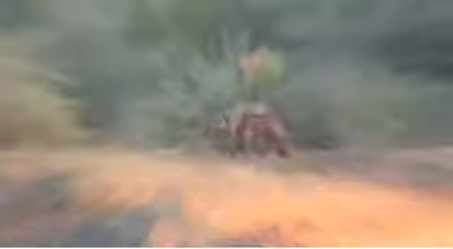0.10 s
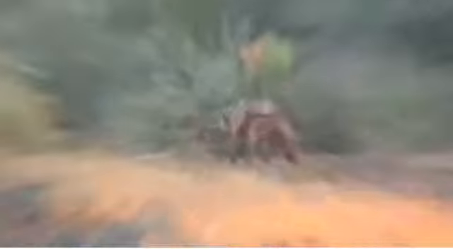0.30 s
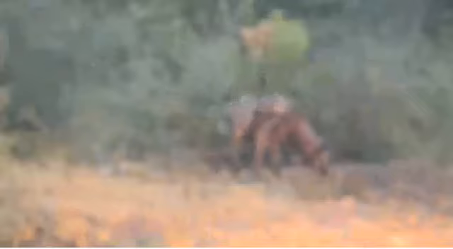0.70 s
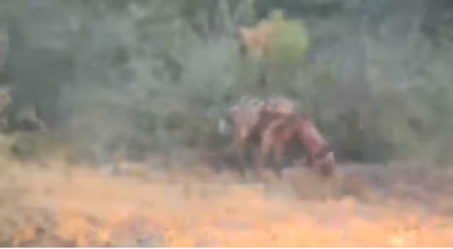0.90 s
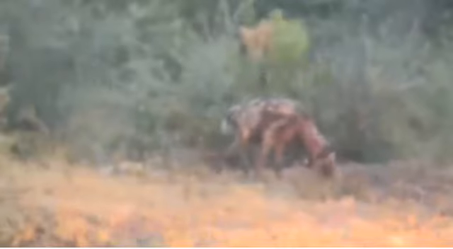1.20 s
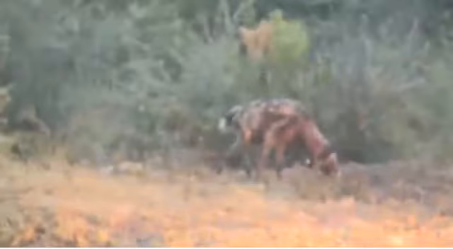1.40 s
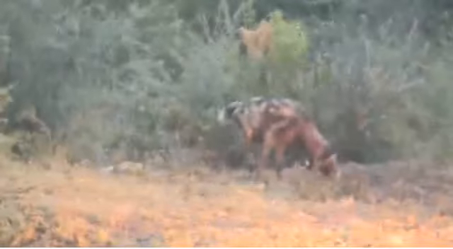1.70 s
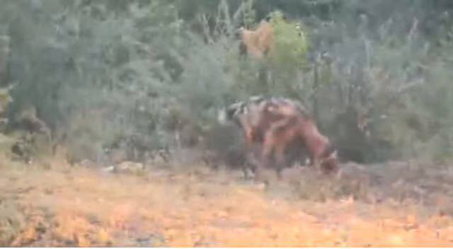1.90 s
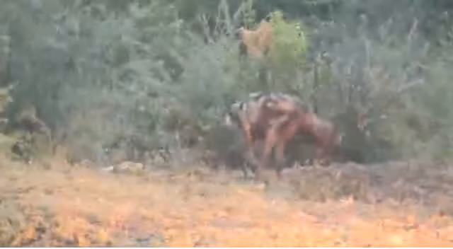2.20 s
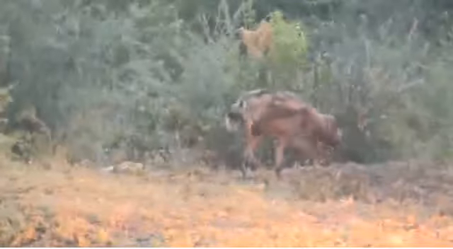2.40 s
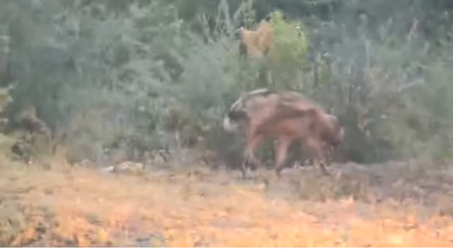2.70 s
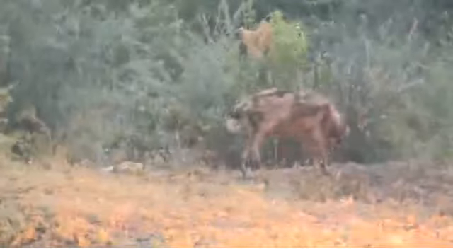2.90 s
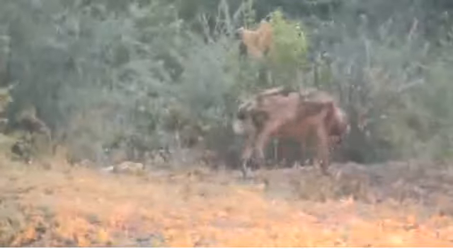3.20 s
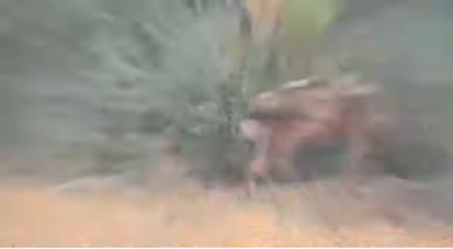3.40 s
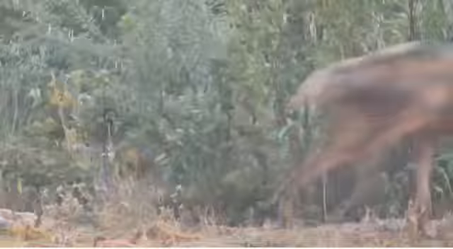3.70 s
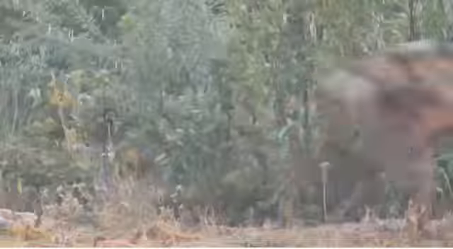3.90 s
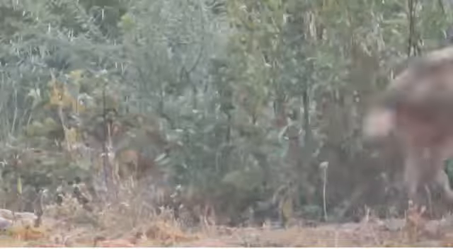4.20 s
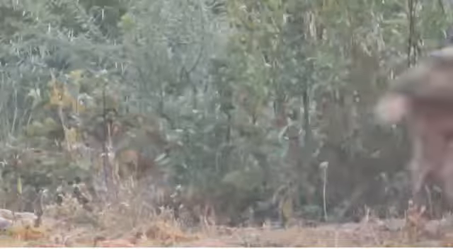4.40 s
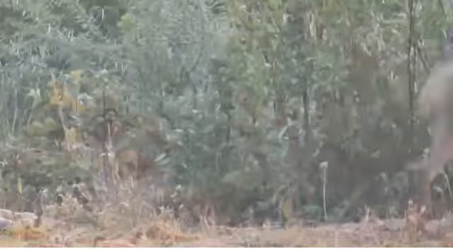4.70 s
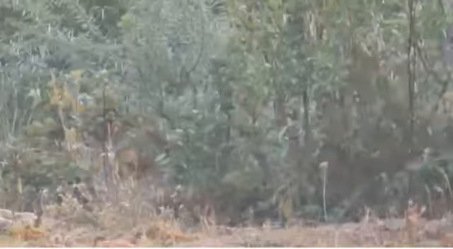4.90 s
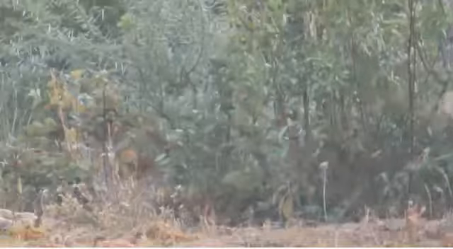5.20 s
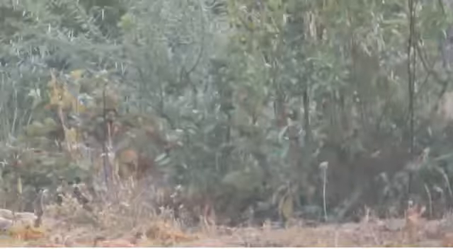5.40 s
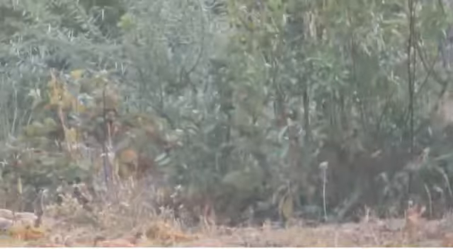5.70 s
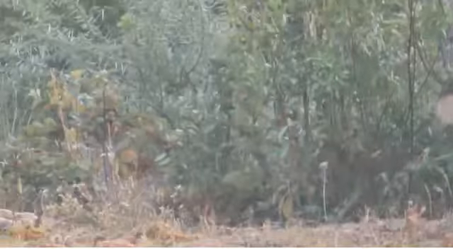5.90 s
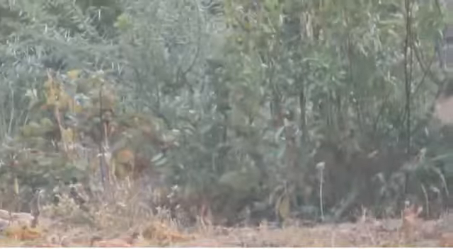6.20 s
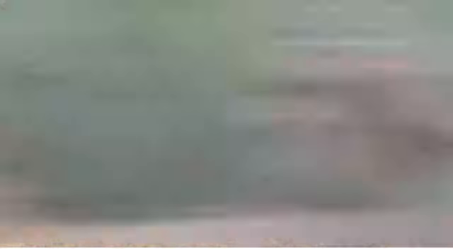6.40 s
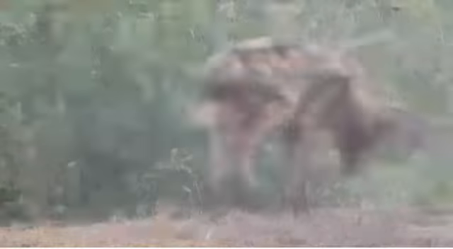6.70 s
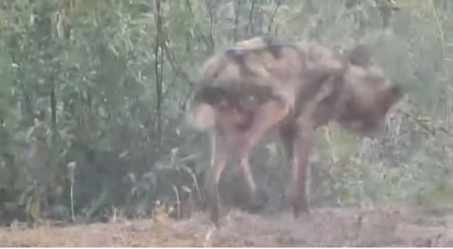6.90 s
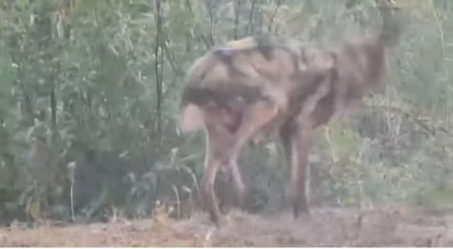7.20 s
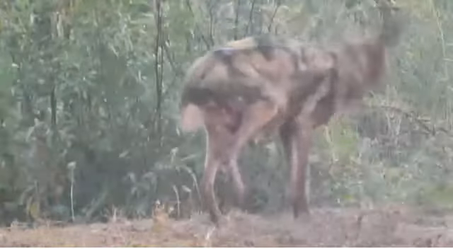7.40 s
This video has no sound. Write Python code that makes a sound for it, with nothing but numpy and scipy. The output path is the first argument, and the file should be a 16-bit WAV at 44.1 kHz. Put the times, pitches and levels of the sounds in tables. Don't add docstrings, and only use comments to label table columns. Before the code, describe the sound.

A water bird gives short, nasal arched yelps in irregular spacing, each echoing off bushes, over a dull outdoor rush and faint hum.

```python
import sys
import numpy as np
from scipy import signal
from scipy.fft import rfft, irfft, next_fast_len
from scipy.io import wavfile
from scipy.ndimage import uniform_filter1d, map_coordinates

SR = 44100
rng = np.random.default_rng(int(sys.argv[2]) if len(sys.argv) > 2 else 0)


def level_to_linear(level):
    exponent = np.asarray(level, float) / 20
    return 10 ** exponent


def store_wav(level_fs):
    pcm = np.round(np.clip(np.atleast_2d(level_fs), -1, 1) * 32767)
    wavfile.write(sys.argv[1], SR, pcm.T.astype(np.int16))


N = 332073

# pitch_hz, density_db (per Hz)
RUSH_SPECTRUM = [(20, -51.5), (45, -25), (70, -8.5), (150, -6.5), (300, -5.5), (450, -2), (700, -1),
                 (1200, -4.5), (1900, -13.5), (3000, -17), (4400, -23), (7000, -27.5), (8600, -43.5),
                 (10500, -71.5)]
RUSH_DB = -53
# pitch_hz, level_db (rms)
MAINS_LINES = [(50.1, -67.5), (100.2, -77), (150.3, -68.5), (200.4, -74), (350.7, -90.5), (450.9, -89)]

# start_s, length_s, pitch_hz,
# level_db, low_overtones_db
FAR_YELPS = [(.0, 0.065, 671, -58.5, 7.5), (1.49, .045, 885, -56, 13), (3.422, 0.062, 747, -49, -11),
             (3.891, 0.11, 757, -62, 0), (3.958, 0.066, 1000, -50, 17), (4.02, 0.027, 1057, -53.5, 15),
             (6.877, 0.093, 675, -54.5, 18), (7.007, 0.044, 696, -57.5, 4)]
# start_s, length_s, pitch_hz, level_db, low_overtones_db
HELD_NOTES = [(.38, .11, 860, -70, -8), (4.25, .3, 815, -67, -4), (4.635, .07, 805, -63, -8),
              (5.295, .13, 803, -63, -12), (6.2, .055, 778, -63, -6), (6.37, .28, 680, -65.5, 4),
              (7.21, .11, 752, -65, 4)]
# start_s, length_s, first_pitch_hz, last_pitch_hz, level_db
LOW_GRUNTS = [(1.055, 0.078, 305, 260, -53), (1.478, 0.034, 1063, 820, -50.5),
              (1.514, 0.025, 696, 500, -52), (1.531, 0.02, 455, 323, -46), (3.746, 0.017, 378, 348, -44.5),
              (6.65, 0.048, 395, 325, -47), (5.438, 0.039, 580, 515, -48), (6.558, 0.034, 1094, 900, -62)]

# start_s, first_pitch_hz, last_pitch_hz, level_db, overtones_db
SMALL_BIRDS = [(.008, 1540, 1260, -58, -7), (0.289, 1644, 1390, -53, -1.5), (1.474, 1664, 1656, -48.5, -7),
               (2.26, 1784, 1630, -55, -2), (3.794, 1506, 1220, -54.5, -1.5),
               (4.163, 1746, 1367, -49.5, -2.5), (5.137, 1580, 1450, -64.5, 4),
               (5.993, 1510, 1360, -55, -3), (6.106, 1736, 1500, -58, 3), (6.162, 1740, 1530, -64, -7)]
CHIP_S = .015
# start_s, length_s, first_pitch_hz, last_pitch_hz, level_db
THIN_WHISTLE = (6.057, .04, 3200, 2450, -57)

# pitch_hz, level_db
BANK_SPECTRUM = [(400, 8), (800, 5.5), (1500, 8), (2300, 0.5), (3000, -1.5), (5000, -0.5), (8000, 6.5),
                 (10000, -14.5), (14000, -35)]
AIR_DB_PER_S = 22
FAR_BANK_S = 0.204
GAP_S, GAP_DB = 0.045, 22
SLAP_DB, FADE_DB_PER_S = 4, 49

# peak_s (loudest moment), rise_s, fall_s, peak_pitch_hz, peak_level_db
YELP_TIMES = [
    (.705, 0.03, 0.026, 772, -25),
    (1.639, 0.013, .021, 748, -34),
    (1.98, .032, 0.028, 783.3, -25),
    (2.614, 0.051, 0.029, 604, -40),
    (3.241, 0.015, .018, 755, -31),
    (4.722, 0.025, 0.03, 789.3, -22),
    (5.446, .047, .024, 672.3, -30),
    (6.662, .025, 0.032, 762, -35.5),
    (6.819, 0.009, 0.019, 717, -37.5),
    (7.358, 0.034, 0.033, 738, -32.5),
]
PITCH_ARCH = [(.8, .77, 2.3, 1.7), (1.3, 0.6, 3, 1.5), (.72, 0.6, 2.9, 2.6), (0.72, 0.58, 2.95, 1.7),
              (.98, .78, 2.3, 2.2), (.82, 0.53, 3.8, 2.3), (.79, 0.63, 1.4, 2.2), (0.7, 0.74, 4, 1.6),
              (1.06, 0.59, 1.88, 1.8), (0.73, .91, 4.29, 1.8)]
RISE_DB, FALL_DB = 25.5, 18.5
PITCH_EASE = .75
FALL_EASE = 1.09
# opening_rasp (0-1), clears_before_peak_s, later_roughness (0-1), strong_weak_share (0-1)
VOICE_RASP = [(.25, .012, .08, .2), (.25, .005, .05, .1), (.15, 0, .15, .27), (.9, .006, .15, .1),
              (.5, .008, .03, .05), (.3, .017, .015, .05), (.6, .02, .1, .12), (.55, .013, .04, .1),
              (.3, .004, .1, .1), (.85, .016, .04, .06)]
CLEARING_S, END_ROUGH = .003, .3
STRONG_WEAK = 2
# low_db, middle_db, top_db, treble_db (resonances), throat_scale (1 = usual)
HEAD_POSTURE = [(2.5, -4.5, -2, -16, 0.99), (6, -6, -6.5, -19, 1.003), (-4, -1.5, 0.5, -20, 1.005),
                (10, -3, 1.5, -14, 0.96), (5.5, 1.5, -23, -5, 1.01), (1.5, 1.5, -0.5, -8, 1.015),
                (14, -6, 1, -24, 0.96), (17, -3, 6.5, 7, 1), (15.5, 6.5, 2, -10, 0.973),
                (13.5, 3, 3.5, 25, 1.018)]
# pitch_hz, width_hz, level_db
THROAT_RESONANCES = [(1850, 820, -14.5), (3055, 840, 4), (3894, 290, 4), (4644, 1720, 2), (7200, 190, -25)]
# pitch_hz, level_db
BEAK_SPECTRUM = [(300, 0), (1500, -2), (2400, 3.5), (5550, -1), (6100, -8.5), (8000, -15.5), (10000, -36.5),
                 (14000, -39.5)]
# level_db, pitch_hz
SQUEAK_STARTS = [(-42.5, 1800), (-34, 2070), (-42, 1775), (-60, 1610), (-38, 1960), (-39, 1784),
                 (-70, 1480), (-57, 1850), (-42, 1860), (-43, 1860)]
PURE_HZ, PURER_DB_PER_HZ, THIRD_DB = 1807, 0.0595, -5.5
CHEST_DB, CHEST_LAG_S = -47, .034
# pitch_hz, level_db
BREATH_SPECTRUM = [(1200, -29), (2000, 2.5), (3500, 0), (6000, -5.5), (8500, -36)]
# level_db, first_slap_db, treble_db, far_bank_db, breath_db
BANK_ANSWERS = [(-11, -5, 1, 3, -10), (-4, -2, 2, 4.5, -2.5), (-11, 0.5, 2, 4, -14), (-13, .6, 4, 0, -8),
                (-4, 1.5, 0.5, 3, -4), (-10, 1.5, 1, 3.5, -15), (-11, 0.5, -0.5, 0.5, -3.5),
                (-9, -1.5, 4, 3, -16), (-6, 1, 3.5, 2, -12), (-6, 1.5, 0, 0, -12)]


def unit(x):
    return x / np.sqrt(np.mean(x ** 2) + 1e-20)


def along(points, hz):
    f, v = np.transpose(points)
    return np.interp(np.log(hz + 1), np.log(f + 1), v)


def coloured(x, points):
    size = next_fast_len(len(x) + 4096)
    gain = level_to_linear(along(points, np.fft.rfftfreq(size, 1 / SR)))
    return irfft(rfft(x, size) * gain, size)[:len(x)]


def wobble(size, rate):
    knots = rng.standard_normal(size // 8 + 4)
    return map_coordinates(knots, [np.arange(size) * rate / SR])


def add(track, s, x):
    part = track[round(s * SR):][:len(x)]
    part += x[:len(part)]


def glide(length_s, first_hz, last_hz):
    u = np.arange(round(length_s * SR)) / (length_s * SR)
    hz = first_hz + (last_hz - first_hz) * u
    phase = 2 * np.pi * np.cumsum(hz) / SR
    return hz, phase, np.sin(np.pi * u)


def background():
    z = signal.stft(rng.standard_normal(N), nperseg=512)[2]
    patches = uniform_filter1d(rng.standard_normal(z.shape), size=5, axis=0)
    patches = unit(uniform_filter1d(patches, size=10, axis=1))
    noise = signal.istft(z * level_to_linear(1.1 * patches), nperseg=512)[1][:N]
    rush = unit(coloured(noise, RUSH_SPECTRUM))
    t = np.arange(N) / SR
    hum = sum(level_to_linear(db) * np.sqrt(2) * np.sin(2 * np.pi * hz * t) for hz, db in MAINS_LINES)
    return level_to_linear(RUSH_DB + 0.17 * wobble(N, 1.597)) * rush + hum


def banks(x, slap_db=0, treble_db=0, far_db=0):
    t = np.arange(SR) / SR
    gap_db = GAP_DB * np.clip(1 - t / GAP_S, 0, 1)
    near_slap_db = (SLAP_DB + slap_db) * np.exp(-((t - .055) / 0.018) ** 2)
    far_slap_db = far_db * np.exp(-((t - FAR_BANK_S) / 0.014) ** 2)
    strength_db = -FADE_DB_PER_S * t - gap_db + near_slap_db + far_slap_db
    tail = rng.standard_normal(SR) * level_to_linear(strength_db + 0.84 * wobble(SR, 60))
    hz, s, z = signal.stft(tail / np.linalg.norm(tail), SR, nperseg=256)
    loss_db = (treble_db - AIR_DB_PER_S * s) * np.minimum(hz[:, None] / 5000, 1.6) ** 2
    tail = signal.istft(z * level_to_linear(loss_db), SR, nperseg=256)[1]
    return coloured(signal.fftconvolve(x, tail), BANK_SPECTRUM)


def voice(hz, rough, sub, gains_db, scale=1, slack_db=0):
    phase = 2 * np.pi * np.cumsum(hz) / SR
    k = np.arange(1, 20)[:, None]
    f = k * hz / scale
    throat = 0
    for (centre, width, db), gain_db in zip(THROAT_RESONANCES, gains_db):
        resonance = 1j * f * width / (centre * centre - f * f + 1j * f * width)
        throat = throat + level_to_linear(db + gain_db) * resonance ** 2
    beak_db = along(BEAK_SPECTRUM, f) - slack_db * f / 5000 + rng.normal(0, 1.2, k.shape)
    throat = np.abs(throat) * level_to_linear(beak_db) * np.exp(1j * rng.normal(0, .8, k.shape))
    smear = np.array([wobble(len(hz), 800) + 1j * wobble(len(hz), 800) for _ in k])
    rough = np.clip(rough, 0, 1)
    lines = np.sqrt(1 - rough) + np.sqrt(rough * np.minimum(f / 3000, 1) / 2) * smear
    lines = lines * (1 + STRONG_WEAK * sub * np.minimum(f / 4500, 1) ** 2 * np.cos(phase / 2))
    pulses = np.real(throat * lines * np.exp(1j * k * phase)).sum(axis=0)
    return pulses / np.sqrt(np.sum(np.abs(throat) ** 2, axis=0) / 2)


def far_voices():
    out = np.zeros(N)
    notes = [(*row, .4) for row in FAR_YELPS] + [(*row, .08) for row in HELD_NOTES]
    for s, length_s, pitch_hz, db, low_db, rough in notes:
        hz, _, shape = glide(length_s, pitch_hz, pitch_hz)
        note = voice(hz * (1 + .02 * shape), rough, 0, (low_db, 0, -10, -20, -10), scale=1.0)
        note = unit(coloured(note, [(1200, -10.5), (1900, 7), (3600, -2), (5000, -11)]))
        note = level_to_linear(db) * np.minimum(1.6 * shape, 1) * note
        add(out, s, 0.8 * level_to_linear(3 * wobble(len(note), 40)) * note)
    out = out + .45 * banks(out)[:N]
    for s, length_s, first_hz, last_hz, db in LOW_GRUNTS:
        _, phase, shape = glide(length_s, first_hz, last_hz)
        level = level_to_linear(db + 4.2 * wobble(len(phase), 180))
        add(out, s, level * shape * (np.sin(phase) + 0.28 * np.sin(2 * phase)))
    return out


def chips():
    out = np.zeros(N)
    for s, first_hz, last_hz, db, over_db in SMALL_BIRDS:
        _, phase, shape = glide(CHIP_S, first_hz, last_hz)
        over = np.sin(2 * phase) + 1.1 * np.sin(3 * phase) + .35 * np.sin(4 * phase)
        note = np.sin(phase) + level_to_linear(over_db) * over
        add(out, s, level_to_linear(db) * shape * note * (1 + 0.6 * wobble(len(phase), 800)))
    s, length_s, first_hz, last_hz, db = THIN_WHISTLE
    _, phase, shape = glide(length_s, first_hz, last_hz)
    add(out, s, level_to_linear(db) * shape * np.sin(phase))
    return out + level_to_linear(-7) * banks(out)[:N]


def squeak(db, pitch_hz):
    _, phase, shape = glide(.009, pitch_hz, pitch_hz)
    first_db = PURER_DB_PER_HZ * (PURE_HZ - pitch_hz)
    tone = level_to_linear(first_db) * np.sin(phase) + np.sin(2 * phase)
    tone = tone + level_to_linear(THIRD_DB + 1.35 * first_db) * np.sin(3 * phase)
    return level_to_linear(db) * shape * tone


def yelps():
    out = np.zeros(N)
    t = np.arange(-.06, .05, 1 / SR)
    calls = zip(YELP_TIMES, PITCH_ARCH, VOICE_RASP, HEAD_POSTURE, BANK_ANSWERS, SQUEAK_STARTS)
    for yelp, arch, rasp, head, answer, squeak_start in calls:
        peak_s, rise_s, fall_s, peak_hz, peak_db = yelp
        first, last, rise_power, fall_power = arch
        opening, clears_s, core, sub = rasp
        low_db, middle_db, top_db, treble_db, scale = head
        answer_db, slap_db, echo_treble_db, far_db, breath_db = answer
        start_s = peak_s + t[0]
        add(out, peak_s - rise_s - .001, squeak(*squeak_start))

        before = np.clip(-t / rise_s, 0, 1)
        after = np.clip(t / fall_s, 0, 1)
        rising = (1 - first) * before ** (PITCH_EASE * rise_power)
        falling = (1 - last) * after ** (FALL_EASE * fall_power)
        hz = uniform_filter1d(peak_hz * (1 - rising - falling), size=220)
        fading_db = FALL_DB * after ** fall_power
        edges = np.clip(np.minimum(t + rise_s + .004, fall_s + .004 - t) / .0023, 0, 1)
        effort = level_to_linear(-RISE_DB * before ** rise_power - fading_db) * edges

        rough = core + (opening - core) / (1 + np.exp((t + clears_s) / CLEARING_S)) + END_ROUGH * after ** 2
        gains_db = (low_db, 0, middle_db, top_db, treble_db)
        slack_db = .6 * fading_db + 5 * before
        pulsed = voice(hz, rough, sub * (1 - .6 * after), gains_db, np.clip(scale, .85, 1.1), slack_db)
        near = level_to_linear(peak_db) * effort * pulsed
        chest = level_to_linear(CHEST_DB) * uniform_filter1d(effort, size=500) * np.sin(2 * np.pi * np.cumsum(hz) / SR)
        hiss = unit(coloured(rng.standard_normal(len(t)), BREATH_SPECTRUM))
        breath = level_to_linear(peak_db + breath_db) * effort * hiss

        add(out, start_s + CHEST_LAG_S, chest)
        add(out, start_s, near + 0.65 * chest)
        echo = banks(near + chest + breath, slap_db, echo_treble_db, far_db)
        add(out, start_s, level_to_linear(answer_db) * echo)
    return out


def scene():
    return (background() + far_voices() + chips() + yelps())[None]


def band_limit(x):
    return signal.sosfilt(signal.butter(12, 14500, fs=SR, output="sos"), x)


def record(dry):
    mix = dry + level_to_linear(-102) * rng.standard_normal(dry.shape)
    return band_limit(mix)


dry = scene()
out = record(dry)
store_wav(out)
```